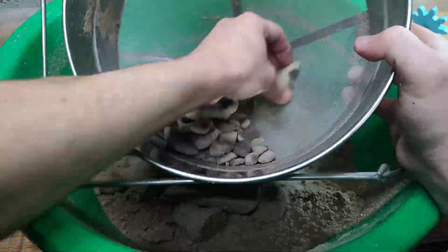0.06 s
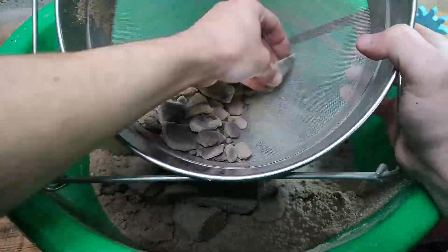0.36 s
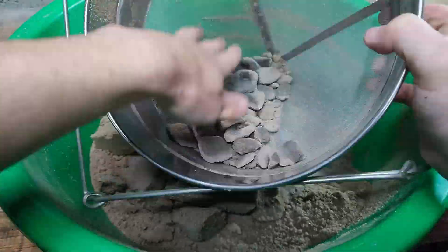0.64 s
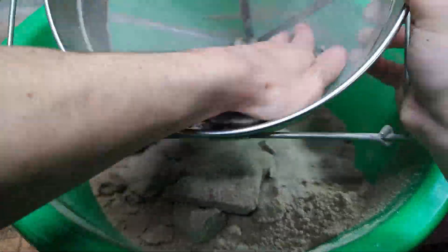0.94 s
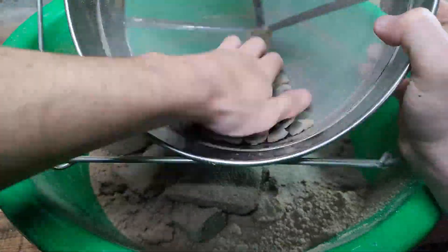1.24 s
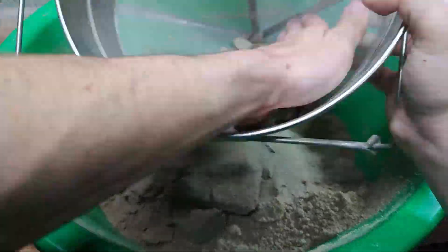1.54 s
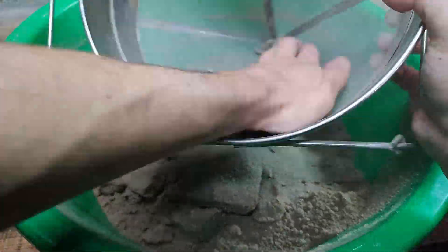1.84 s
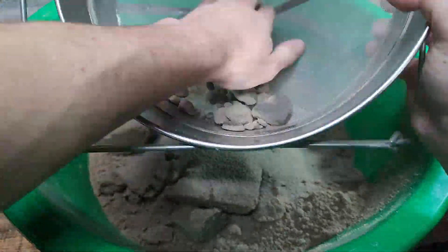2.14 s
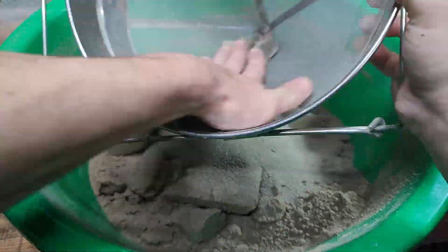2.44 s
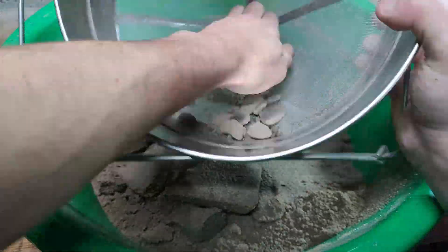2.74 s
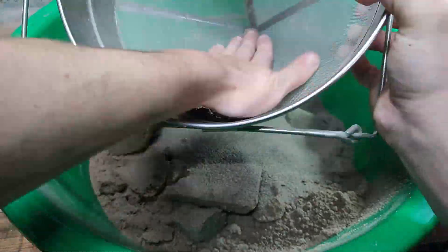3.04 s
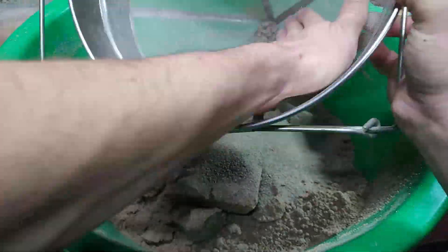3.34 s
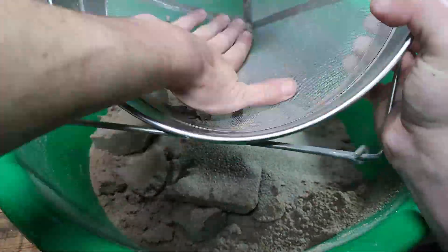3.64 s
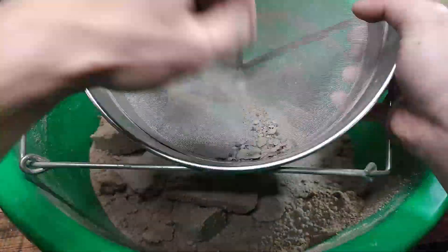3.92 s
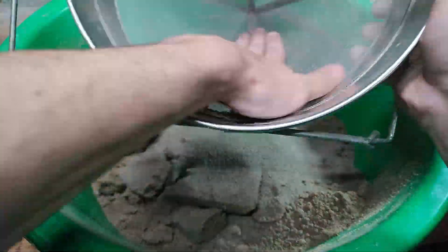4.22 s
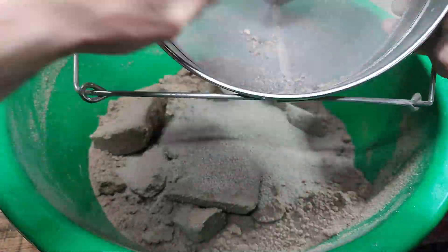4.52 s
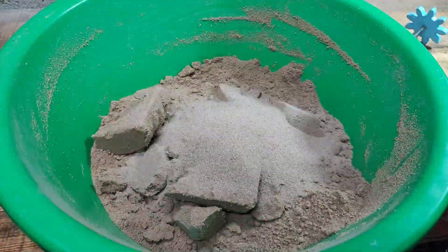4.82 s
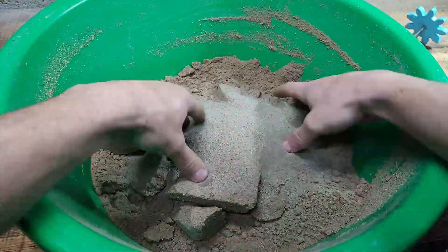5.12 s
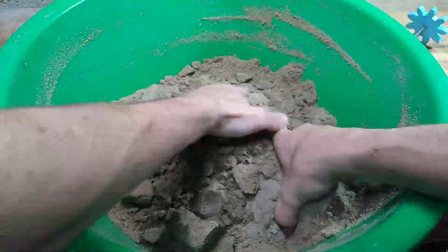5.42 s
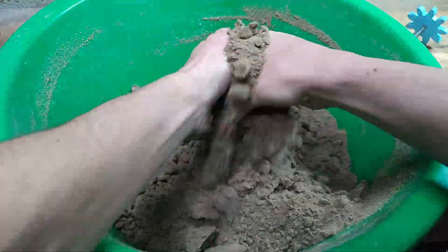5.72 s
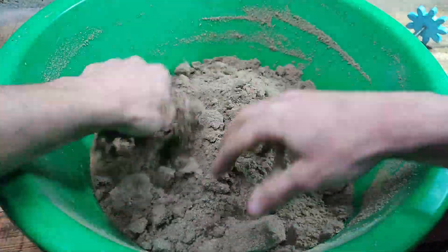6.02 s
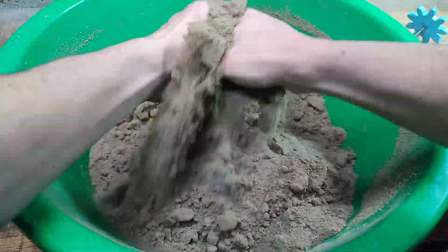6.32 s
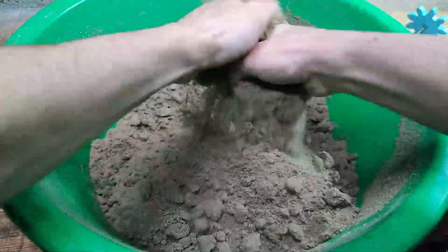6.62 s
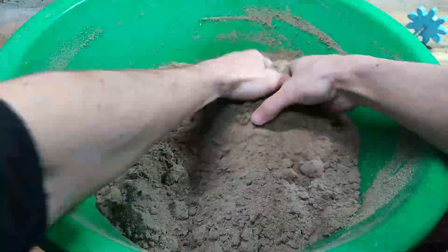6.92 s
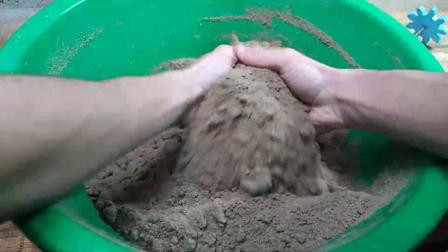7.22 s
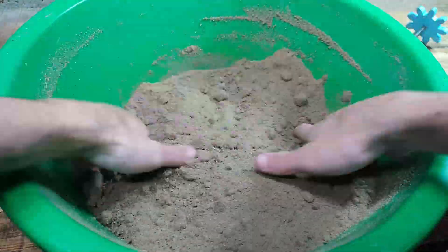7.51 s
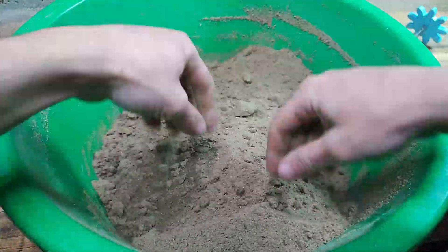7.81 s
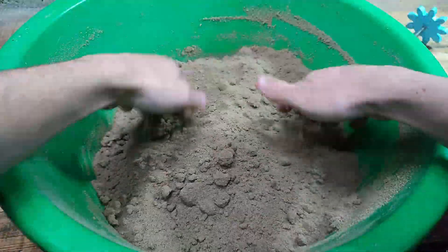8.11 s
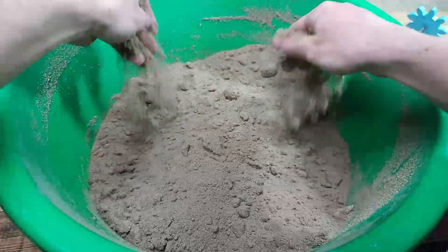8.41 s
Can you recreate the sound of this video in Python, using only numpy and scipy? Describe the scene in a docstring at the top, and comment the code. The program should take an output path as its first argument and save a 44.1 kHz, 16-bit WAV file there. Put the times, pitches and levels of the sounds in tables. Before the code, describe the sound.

Close up in a quiet room without echo, sand scrapes across wire mesh as a hand pushes it through a sieve over a plastic tub. The bright, rasping strokes come two or three a second, with a few dull knocks from lumps. Then the sound drops to faint rustling and crunching as handfuls are squeezed, crumble and fall back on the heap. Moving air now and then thumps softly on the microphone.

```python
"""In a quiet, dead room, a palm rubs damp sand through a fine wire sieve over a plastic tub.
Grains scrape the wires as the hand sticks and slips, making dry, juddering strokes of hiss.
The last crumbs slide off, then both hands knead the sifted sand, which crunches softly and falls back.
Lumps knock and crack, and moving arms and the sieve push small puffs of air at the close microphone."""
import sys
import numpy as np
from scipy import signal
from scipy.fft import rfft, irfft, next_fast_len
from scipy.io import wavfile
from scipy.ndimage import uniform_filter1d, map_coordinates

SR = 44100
rng = np.random.default_rng(int(sys.argv[2]) if len(sys.argv) > 2 else 0)


def waveform_to_disk(signal):
    """Save audio, clipped to [-1, 1], as 16-bit WAV at the path in sys.argv[1]."""
    frames = np.transpose(np.atleast_2d(signal))
    scaled = np.clip(frames, -1, 1) * 32767
    samples = np.round(scaled).astype(np.int16)
    wavfile.write(sys.argv[1], SR, samples)


N = 381817


def amp(db):
    """Turn decibels into a number to multiply by."""
    return 10 ** (np.asarray(db) / 20)


def unit(x):
    """Scale a sound to an average strength (rms) of 1."""
    return x / np.sqrt(np.mean(x ** 2) + 1e-20)


def along(points, hz):
    """Read a curve of (pitch_hz, level_db) points at any pitch."""
    pitches, levels = np.transpose(points)
    return np.interp(np.log(hz + 1), np.log(pitches + 1), levels)


def wobble(rate):
    """A smooth curve through `rate` random values a second."""
    return map_coordinates(rng.standard_normal(int(N * rate / SR) + 4), [np.arange(N) * rate / SR])


def filtered(x, response):
    """Turn each frequency up or down by response(hz)."""
    size = next_fast_len(N + SR // 2)
    return irfft(rfft(x, size) * response(np.fft.rfftfreq(size, 1 / SR)), size)[..., :N]


def coloured(x, tone):
    """Shape a sound with a tone curve, then set its strength to 1."""
    return unit(filtered(x, lambda hz: amp(along(tone, hz))))


def noise():
    """Separate hiss for left and right."""
    return rng.standard_normal((2, N))


def grains(per_s, clump_db, clumps_per_s, patchy_db):
    """Tiny impacts come in clumps; the changing contact favours now some pitches, now others."""
    ticks = noise() * (rng.random((2, N)) < per_s / SR) * amp(clump_db * wobble(clumps_per_s))
    spectra = signal.stft(ticks, nperseg=1024)[2]
    patches = uniform_filter1d(rng.standard_normal(spectra.shape), size=3, axis=1)  # blur across pitch
    patches = uniform_filter1d(patches, size=9, axis=2)  # and across time
    return signal.istft(spectra * amp(patchy_db * unit(patches)), nperseg=1024)[1][:, :N]


def touch(peak_s, rise_s, fade_s):
    """The loudness of a soft contact: a rounded peak that dies away on both sides."""
    t = np.arange(N) / SR - peak_s
    distance = t / np.maximum(np.where(t < 0, rise_s, fade_s), .002)
    return amp(np.maximum(20 * (1 - np.sqrt(1 + distance ** 2)), -200))


def swell(start_s, length_s):
    """A quick rise and slower fall that peaks after a third of its length."""
    age = np.clip((np.arange(N) / SR - start_s) / (max(length_s, .005) / 3), 0, 40)
    return (age * np.exp(1 - age)) ** 2


def together(contacts):
    """Add the power of contacts into two loudness curves; offset_db sets the second against the first."""
    first, second = np.zeros(N), np.zeros(N)
    for shape, level_db, offset_db in contacts:
        power = (amp(level_db) * shape) ** 2
        first += power
        second += power * amp(2 * offset_db)
    return np.sqrt(first), np.sqrt(second)


def room():
    """The room rumbles and hisses faintly all the time."""
    # tone of the background: pitch_hz, level_db
    room_tone = [(15, -3.5), (35, 1.5), (70, -13), (130, -16.5), (300, -20), (1000, -28.5), (2000, -31),
                 (5000, -37), (12000, -39.5), (15500, -41.5)]
    return coloured(noise(), room_tone) * amp([[-66], [-68]])


def shove(start_s, length_s, bite_s, growth_db, slip_hz, judder_db):
    """The loudness of one push: the palm bites, sticks and slips over and over, then lets go."""
    bite_db, release_db_per_s, drift_cycles = 14.5, 1000, 0.03
    t = np.arange(N) / SR - start_s
    held_s = np.clip(t, 0, length_s)
    edges_db = bite_db * np.maximum(1 - t / bite_s, 0) + release_db_per_s * np.maximum(t - length_s, 0)
    slip_db = judder_db * np.cos(2 * np.pi * (slip_hz * held_s + drift_cycles * wobble(20)))
    return amp(np.maximum(growth_db * (held_s / length_s - .5) - slip_db - edges_db, -200))


def rubbing():
    """How hard the hand rubs the wires, and how hard that shakes the sieve's body."""
    # firm palm pushes: start_s, length_s, bite_s, friction_db, growth_db, body_offset_db,
    # slip_hz, judder_db
    pushes = [(0, 0.4, 0.015, -29.5, 1, -7.5, 24, -0.07), (0.55, 0.12, 0.023, -29.5, -4.5, -7, 20, 0.5),
              (0.703, 0.11, 0.0094, -37, -1.2, -3, 20, 2.5), (0.802, 0.33, 0.046, -31, 3.5, -5, 39, 2.5),
              (1.3, 0.38, 0.033, -28.5, 0.6, -6, 38.5, 1.9), (1.87, 0.255, 0.03, -31, 3, -5, 33.5, 2),
              (2.224, 0.19, 0.017, -32, 3, -6, 33.7, 1.8), (2.586, 0.14, 0.035, -29, -0.5, -6, 16, 1),
              (2.888, 0.26, 0.016, -33.5, -3, -5.5, 29.8, 3), (3.299, 0.12, 0.017, -32.5, 1, -5.5, 29, 3.5),
              (3.566, 0.15, 0.016, -33.5, -3, -6.5, 30.5, 3), (3.826, 0.12, 0.031, -48, -7, -7.5, 17.8, 2),
              (4.094, 0.13, 0.016, -35.5, 1, -7.5, 28, 2.3)]
    # light fingers and sliding crumbs: peak_s, rise_s, fade_s, friction_db, body_offset_db
    brushes = [(0.431, 0.02, 0.018, -37, -8), (0.47, 0.014, 0.019, -42, -4.5),
               (0.522, 0.016, 0.034, -31, -6.5), (1.154, 0.025, 0.031, -45, -0.5),
               (1.196, 0.013, 0.016, -36, -3.5), (1.248, 0.049, 0.07, -52, -2.5),
               (1.732, 0.04, 0.026, -47.5, -3.5), (1.803, 0.01, 0.016, -36.5, -3),
               (1.846, 0.015, 0.015, -41, -3), (2.176, 0.044, 0.062, -50, -2),
               (2.501, 0.011, 0.016, -29.5, -6.5), (2.531, 0.014, 0.019, -34.5, -5),
               (2.581, 0.012, 0.011, -34, -4.5), (2.748, 0.015, 0.021, -44, -2),
               (2.798, 0.012, 0.03, -42.5, -6.4), (2.848, 0.008, 0.015, -40, -3.5),
               (3.218, 0.0113, 0.02, -37, -6.5), (3.26, 0.012, 0.014, -41, -3.5),
               (3.472, 0.014, 0.018, -45, -5.2), (3.528, 0.021, 0.022, -49, -1.5),
               (3.781, 0.024, 0.03, -52.5, -6), (4.013, 0.011, 0.025, -43, -5),
               (4.065, 0.012, 0.011, -46.5, -5.5), (4.278, 0.0094, 0.014, -34, -5),
               (4.31, 0.012, 0.011, -36, -8), (4.359, 0.014, 0.023, -35, -6),
               (4.419, 0.011, 0.032, -35, -6), (4.479, 0.012, 0.013, -38, -9.5),
               (4.517, 0.0096, 0.025, -40.5, -6.5), (4.78, 0.032, 0.042, -57, -5),
               (4.889, 0.011, 0.017, -58.5, -12), (4.946, 0.0067, 0.012, -65.5, 11.5),
               (5.057, 0.0086, 0.019, -51.5, -2.5), (5.119, 0.013, 0.019, -48.5, -2)]
    firm = [(shove(start, length, bite, growth, slip, judder), db, body)
            for start, length, bite, db, growth, body, slip, judder in pushes]
    light = [(touch(peak, rise, fade), db, body) for peak, rise, fade, db, body in brushes]
    return together(firm + light)


def ringing(x, rings):
    """The tight mesh and its hoop colour the sound in narrow bands of pitch."""
    def lift_db(hz):
        return sum(db / (1 + (2 * (hz - pitch) / width) ** 2) for pitch, width, db in rings)
    return filtered(x, lambda hz: amp(lift_db(hz)))


def rasp():
    """The loudness flickers as the pressure wavers and coarse grains snag on a wire."""
    snags_per_s, snag_s, snag_db = 150, 0.0008, -10.5
    snags = (rng.random(N) < snags_per_s / SR) * rng.random(N)
    scratches = signal.lfilter([1], [1, -np.exp(-1 / (snag_s * SR))], snags)
    return unit(amp(0.67 * wobble(45)) * (1 + amp(snag_db) * scratches))


def sieve():
    """Grains scrape over the wires, ring the hoop and bend the whole mesh."""
    # tones of the hissing wires, the sieve's body and the bending mesh: pitch_hz, level_db
    wire_tone = [(1500, -41.5), (3000, -11), (4600, -5), (6000, -1), (8000, 3), (10000, -4.5), (13000, -2),
                 (15500, -4)]
    body_tone = [(100, -33.5), (200, -20.5), (330, -12.5), (550, -13.5), (740, -15.5), (1100, -8),
                 (2000, -2.5), (2500, 2), (3900, 0), (4800, -8.5), (7000, -26)]
    bend_tone = [(10, 4), (28, 7), (50, -8), (90, -19.5), (160, -28), (400, -61.5)]
    # rings of mesh and hoop under the palm, and under fingertips: pitch_hz, width_hz, lift_db
    palm_rings = [(912, 60, 5.5), (1210, 140, 5.5), (1770, 180, 8.5), (3086, 97, 2.5), (3400, 80, -1.5)]
    finger_rings = [(907, 60, 3.5), (1180, 220, 7), (1768, 180, 2), (2800, 400, 2)]
    palm_down_s, settle_s = 0.68, 0.06  # the flat palm takes over from the fingertips
    friction, shaking = rubbing()
    hiss = grains(per_s=22000, clump_db=0.3, clumps_per_s=500, patchy_db=3.0)
    wires = amp(2.5) * friction * coloured(hiss, wire_tone)
    scrape = grains(per_s=11000, clump_db=0.5, clumps_per_s=260, patchy_db=2.5)
    palm = np.clip((np.arange(N) / SR - palm_down_s) / settle_s, 0, 1)
    hoop = palm * ringing(scrape, palm_rings) + (1 - palm) * ringing(scrape, finger_rings)
    body = amp(0.5) * shaking * coloured(hoop, body_tone)
    # heavy pressure bends the mesh far more
    bending = friction ** 1.363 * coloured(noise(), bend_tone) * amp([[-8], [-21]])
    return rasp() * (wires + body) + bending


def tub(x, delay_s, sway, echo_db):
    """The tub wall echoes the hiss; the path changes as the sieve sways, so the tone shifts."""
    delays = delay_s * SR * np.exp(sway * np.array([wobble(4.4), wobble(4)]))
    echo = np.array([map_coordinates(side, [np.arange(N) - delay]) for side, delay in zip(x, delays)])
    return (x + amp(echo_db) * echo) / np.sqrt(1 + amp(2 * echo_db))


def puffs():
    """Moving air thumps the microphone, mostly on the left; weak swirls come and go in between."""
    # puffs of air: start_s, level_db, left_minus_right_db, length_s
    gusts = [(0.422, -34.5, 14, 0.04), (0.847, -43, -3, 0.049), (2.791, -49, 16, 0.058),
             (3.154, -48.5, 22, 0.095), (3.368, -44, 2, 0.049), (3.733, -44, 32, 0.057),
             (3.795, -46, 22, 0.039), (4.05, -47.5, 17, 0.042), (4.084, -42, 9, 0.055),
             (4.411, -50, 6, 0.045), (5.344, -55, 9, 0.056), (6.037, -51, 18, 0.029),
             (6.455, -55, 19, 0.041), (6.596, -49, -3, 0.026), (7.258, -51, -1, 0.037),
             (7.638, -47.5, -3, 0.03), (7.912, -45, 25, 0.062), (8.017, -45, 21, 0.06),
             (8.073, -49, 30, 0.06), (8.402, -49.5, -2.5, 0.061)]
    # deep tone of the moving air: pitch_hz, level_db
    air_tone = [(12, -7.5), (35, 6), (70, 0.5), (130, -10.5), (200, -20.5), (400, -43.5), (1000, -79.5)]
    pressure = np.zeros((2, N))
    for start_s, level_db, lean_db, length_s in gusts:
        share = 1 / (1 + amp([[-lean_db], [lean_db]]))
        pressure += amp(level_db) * share * swell(start_s, length_s)
    swirls = amp(4.5 * wobble(12)) * amp([[-75.5], [-82]])
    return (amp(1) * pressure + swirls) * coloured(noise(), air_tone)


def bursts(lumps, spread, gain_db):
    """Each lump gives a short burst of noise around its pitch; sand stops it from ringing."""
    out = np.zeros((2, N))
    size = SR // 8
    hz = np.fft.rfftfreq(size, 1 / SR)
    for start_s, level_db, pitch_hz, length_s in lumps:
        span = slice(round(start_s * SR), round(start_s * SR) + size)
        band = 1 / (1 + (np.log((hz + 1) / pitch_hz) / spread) ** 4)
        burst = unit(irfft(rfft(rng.standard_normal((2, size))) * band, size))
        out[:, span] += amp(level_db + gain_db) * swell(start_s, length_s)[span] * burst
    return out


def knocks():
    """Lumps knock dully on the sieve or the heap."""
    # lumps landing: start_s, level_db, pitch_hz, length_s
    lumps = [(0.647, -39, 633, 0.022), (1.102, -41, 482, 0.037), (3.096, -43.5, 600, 0.028),
             (3.745, -51.5, 134, 0.063), (4.663, -62.5, 253, 0.022), (5.086, -53, 220, 0.026),
             (5.294, -65, 546, 0.035), (6.055, -55.5, 598, 0.016), (6.28, -59, 448, 0.031),
             (6.825, -58, 150, 0.028), (7.22, -53.5, 210, 0.05), (7.464, -60, 334, 0.043),
             (8.275, -59, 498, 0.019)]
    return bursts(lumps, spread=0.67, gain_db=-5.0)


def kneading():
    """Squeezed clods crunch, shed fine grit and land softly on the heap."""
    # squeezes of a handful: peak_s, fade_s, crunch_db, grit_offset_db
    squeezes = [(5.246, 0.22, -76.2, -3), (5.453, 0.036, -69, -2.1), (5.62, 0.145, -75, -5.2),
                (5.938, 0.046, -68, -6), (5.997, 0.019, -75, -0.5), (6.09, 0.061, -64, -5),
                (6.264, 0.033, -59.5, -7), (6.331, 0.076, -72.8, -5.5), (6.491, 0.018, -65.5, -6),
                (6.575, 0.056, -65, -3), (6.705, 0.015, -65, -2.5), (6.828, 0.026, -62.5, -4.5),
                (6.919, 0.102, -68, -6), (6.95, 0.018, -59, -5.5), (7.05, 0.027, -59.5, -5),
                (7.19, 0.047, -61.5, -5.5), (7.312, 0.014, -58.5, -5), (7.355, 0.02, -64, -1),
                (7.459, 0.031, -61.5, -6.5), (7.558, 0.055, -65, -1.3), (7.718, 0.028, -67.5, -4.2),
                (7.881, 0.033, -61.5, -3.5), (7.955, 0.021, -64, -6), (8.195, 0.093, -66.8, -3.7),
                (8.277, 0.024, -62, -2.5), (8.42, 0.017, -66.5, -9), (8.495, 0.032, -70, -3.5)]
    # tones of crunching clods, fine grit and falling sand: pitch_hz, level_db
    crunch_tone = [(350, -24), (750, -6), (1150, 3), (1600, -4.5), (2500, -7.5), (3700, -10), (6000, -25)]
    grit_tone = [(2500, -23), (4300, -4.5), (7000, -2), (10000, -3.5), (15500, -2.5)]
    fall_tone = [(100, -10), (220, 0.5), (380, 1.5), (650, -3), (1100, -31), (3000, -60)]
    start_s, fall_s, stir_db, trickle_db = 5.13, 0.016, -84.5, -78.5
    squeeze, shed = together([(touch(peak, rise_s=0.37 * fade, fade_s=fade), db, offset)
                              for peak, fade, db, offset in squeezes])
    # sand keeps shifting and trickling between squeezes
    stirring = (np.arange(N) / SR > start_s) * amp(2.3 * wobble(36))
    lag = np.exp(-1 / (fall_s * SR))
    landing = signal.lfilter([1 - lag], [1, -lag], squeeze)  # trails just behind each squeeze
    crumbling = unit(amp(1.8 * wobble(170)))
    coarse = grains(per_s=4500, clump_db=1.0, clumps_per_s=330, patchy_db=4.0)
    fine = grains(per_s=9000, clump_db=0.5, clumps_per_s=600, patchy_db=2.0)
    crumbs = grains(per_s=970, clump_db=4.5, clumps_per_s=70, patchy_db=1.5)
    crunch = np.hypot(amp(1.0) * squeeze, amp(stir_db) * stirring) * coloured(coarse, crunch_tone)
    grit = np.hypot(amp(3.5) * shed, amp(stir_db + 0.5) * stirring) * coloured(fine, grit_tone)
    fall = np.hypot(amp(-6) * landing, amp(trickle_db) * stirring) * coloured(crumbs, fall_tone)
    return crumbling * (crunch + grit + fall) * amp([[.7], [-.7]])


def cracks():
    """Clods crack between the fingers."""
    # clods breaking: start_s, level_db, pitch_hz, length_s
    clods = [(5.27, -51, 1000, 0.011), (5.589, -56, 1350, 0.018), (5.615, -56, 1500, 0.035),
             (6.074, -45.5, 1290, 0.019), (6.944, -47, 1110, 0.02), (7.874, -51.5, 1350, 0.02),
             (8.414, -48.5, 1010, 0.018), (8.485, -55, 1200, 0.018)]
    return bursts(clods, spread=0.38, gain_db=-12.0)


def scene():
    """Sieving, then kneading, over the quiet room."""
    lumps = knocks() + cracks()
    sieving = tub(sieve(), delay_s=.0014, sway=0.069, echo_db=-18.5)
    return sieving + kneading() + lumps + puffs() + room()


def record(dry):
    """Each microphone opening colours the treble in its own way; the very highest sounds are cut off."""
    # tones of the left and right openings: pitch_hz, level_db
    left_tone = [(6000, 2.5), (6900, 3.5), (7700, 1), (8500, 3), (9200, 0.5), (9800, -4.5), (11200, -1)]
    right_tone = [(5900, 2), (6800, 6.5), (7250, 8), (7900, -4.5), (8700, -9.5), (9200, -3), (10200, -1.5),
                  (11200, -1.5)]
    top_hz, edge_hz = 15550, 300

    def response(hz):
        cutoff = np.clip((top_hz - hz) / edge_hz + .5, 0, 1) ** 2
        return amp([along(left_tone, hz), along(right_tone, hz)]) * cutoff
    return filtered(dry, response)


dry = scene()
out = record(dry)
waveform_to_disk(out)
```